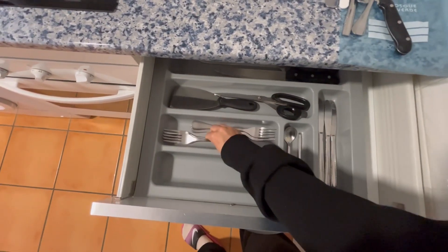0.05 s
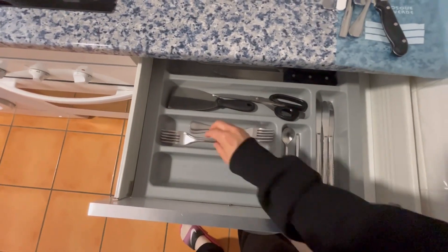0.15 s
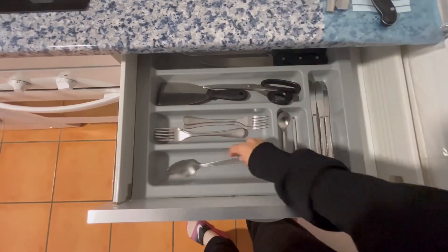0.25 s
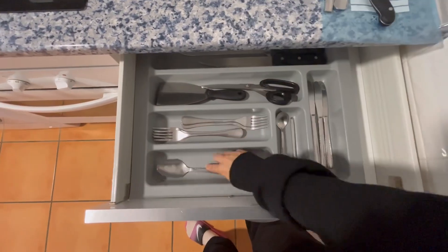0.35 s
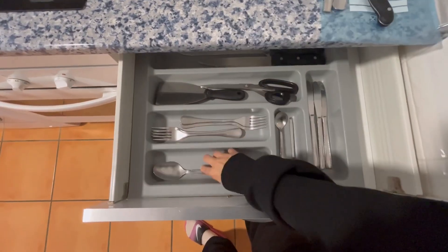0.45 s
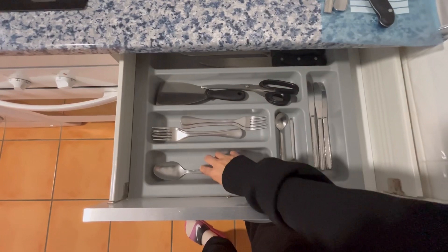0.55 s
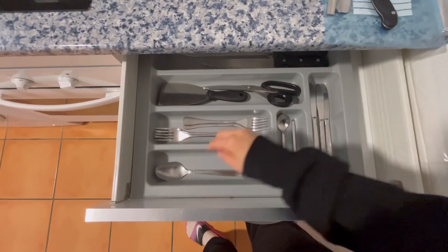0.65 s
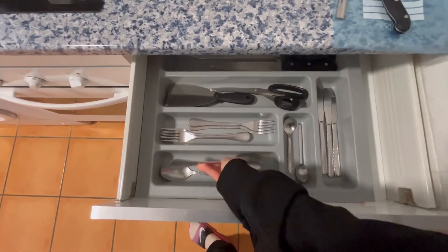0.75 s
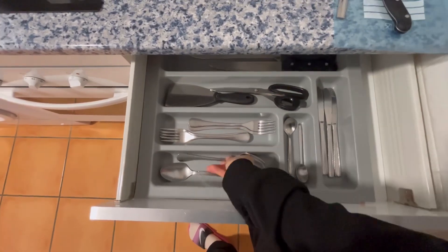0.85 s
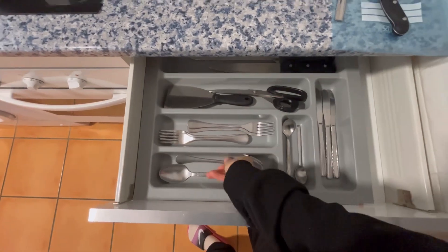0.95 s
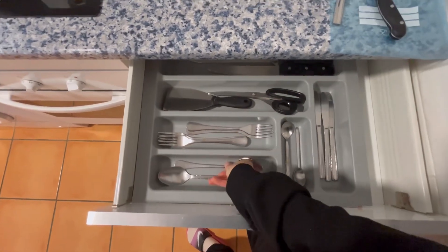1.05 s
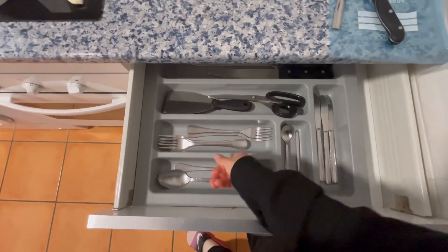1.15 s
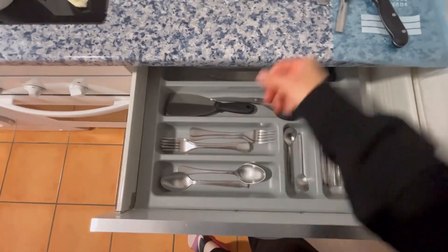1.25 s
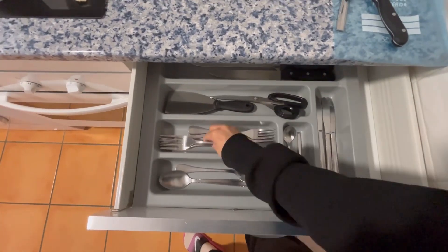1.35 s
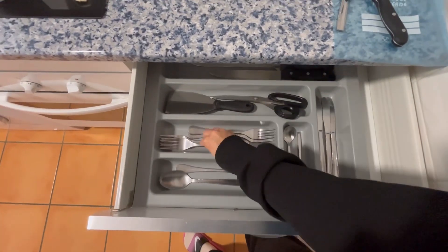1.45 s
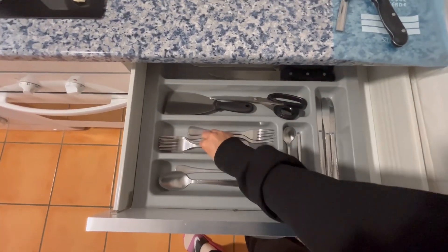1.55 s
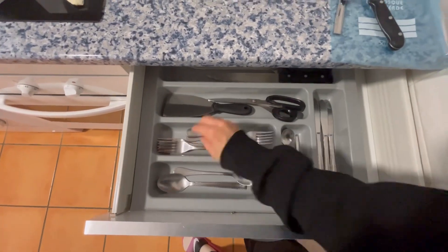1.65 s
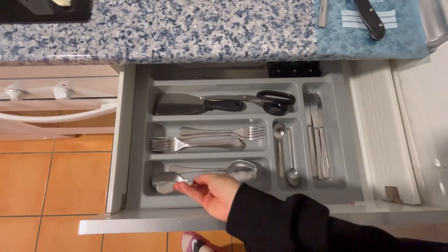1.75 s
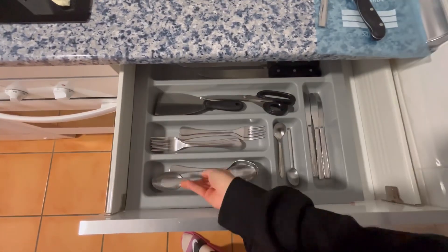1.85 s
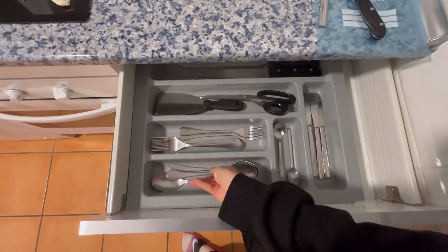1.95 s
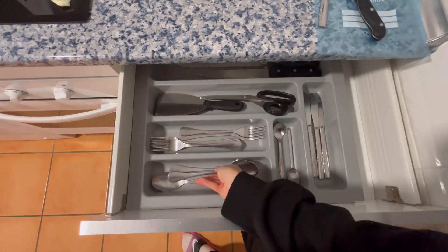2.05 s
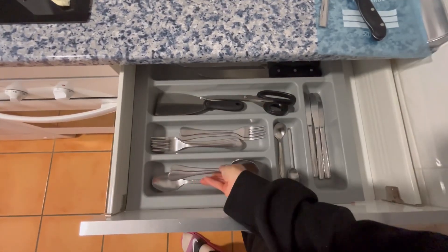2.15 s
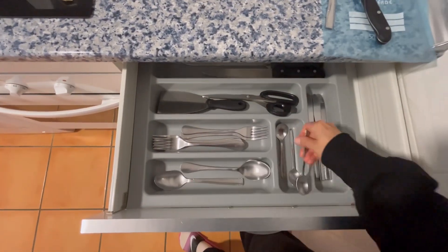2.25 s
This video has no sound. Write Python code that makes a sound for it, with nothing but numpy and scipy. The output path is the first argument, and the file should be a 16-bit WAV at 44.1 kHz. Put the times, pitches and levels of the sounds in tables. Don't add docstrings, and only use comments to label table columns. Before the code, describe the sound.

Metal forks and spoons clink and knock into a plastic cutlery tray in quick abrupt bursts

```python
import sys
import numpy as np
from scipy import signal
from scipy.fft import rfft, irfft
from scipy.io import wavfile
from scipy.ndimage import uniform_filter1d

SR = 44100
rng = np.random.default_rng(int(sys.argv[2]) if len(sys.argv) > 2 else 0)


def nominal_scale(level):
    x = np.asarray(level, float) / 20
    return 10 ** x


def to_wav(sig):
    pcm = np.clip(np.atleast_2d(sig), -1, 1) * 32767
    pcm = np.round(pcm).astype(np.int16)
    wavfile.write(sys.argv[1], SR, pcm.T)


N = 101430
RUN_IN, SIZE = 8192, 65536
HZ = np.maximum(np.arange(SIZE // 2 + 1) * SR / SIZE, 1)
LEFT_RIGHT = np.array([[.5], [-.5]])

SHOT_EDGES_S = [0, .197, .699, 1.303, 1.702, 2.238, 2.31]
FADE_IN_S = [.001, 0.015, 0.0021, 0.095, 0.083, 0.049]
SHOT_TONE_DB = [8, 3.5, -3, 1, 6, -10.5]
SHOT_PAN_DB = [0.1, -0.6, 0.3, -0.88, 0.21, 0.039]

# (frequency [Hz], density [dB per Hz])
TONE = [(25, -45.5), (45, -13.5), (66, 0), (100, -17), (250, -8.5), (600, -28), (3000, -23.5), (15000, -58)]
TONE_DB = -57
# (frequency [Hz], T60 [s])
ROOM = [(100, 1), (260, 0.41), (700, 0.37), (1840, 0.42), (4850, 0.42), (12800, 0.3)]
ROOM_DB, ROOM_GAP_S, DRAWER_DB, DRAWER_T60_S = -9, 0.0067, 3, 0.016
# (frequency [Hz], left lead [rad])
LEAD = [(100, 0.11), (350, -.1), (550, -1.1), (1100, -1.8), (2000, -1.5), (5000, -1.4), (9000, -1.5),
        (13000, -2.3)]
# (frequency [Hz], left minus right [dB])
TILT = [(60, 4), (250, -3), (500, 0.1), (1000, 0.5), (2000, 5.5), (4000, 3), (8000, 8), (13000, -2.5)]
# (frequency [Hz], likeness [0-1])
ALIKE = [(60, 1), (350, 0.81), (600, 0.67), (2000, 0.18), (12000, 0.46)]

# (time [s], frequency [Hz], level [dB], T60 [s])
BUMPS = [
    (.268, 105, -18.5, 0.15),
    (.212, 520, -24, 0.2),
    (.259, 490, -17.5, .14),
    (1.152, 505, -33, 0.14),
    (1.598, 512, -31, .13),
    (1.018, 500, -20, 0.064),
]
# (time [s], frequency [Hz], level [dB], T60 [s])
PINGS = [(.3565, 1400, -11, .04), (.3925, 6300, -20, .018), (.806, 1900, -20, .03), (.8445, 2050, -12, .03),
         (.8575, 5900, -17, .04), (.874, 14200, -21, .1), (1.016, 1500, -23, .08), (1.017, 900, -23, .08),
         (1.03, 8400, -33, .15), (1.192, 6200, -55, .2), (1.605, 1680, -45, .16), (1.833, 15230, -17, .1),
         (1.912, 15200, -16, .12), (1.927, 2090, -12, .06), (1.942, 2070, -12, .12),
         (1.966, 13808, -12, .14)]

# (time [s], tray knock [dB], steel clink [dB], rise [s],
# chatter [s])
CONTACTS = [(-.12, -20, -22, 0.0042, 0.039), (0.039, -46.5, -45, 0.003, 0.068),
            (0.138, -79, -53, 0.0023, 0.01), (0.196, -14, -28, 0.015, 0.041),
            (0.257, -18.5, -32, 0.0059, 0.0061), (0.3, -22, -33.5, 0.0031, 0.011),
            (0.3562, -18, -27.5, 0.0018, 0.072), (0.6998, -52.5, -50, 0.0011, 0.011),
            (.728, -31.5, -59, 0.0049, 0.049), (0.756, -31, -57, 0.0056, 0.0058),
            (0.8039, -19, -26, 0.00092, 0.037), (0.8355, -7, -33.5, .001, 0.0049),
            (.857, -12, -18.5, 0.002, 0.022), (.985, -23, -52.5, 0.023, 0.016),
            (1.026, -32, -24, 0.00098, 0.0036), (1.147, -46, -63, 0.0021, 0.012),
            (1.334, -15.5, -25, 0.0084, 0.078), (1.386, -12, -17.5, 0.0052, 0.039),
            (1.443, -29, -24.5, 0.002, 0.008), (1.595, -37.5, -38, 0.002, 0.0067),
            (1.746, -68, -58, 0.021, 0.0077), (1.83, -21.5, -17.5, 0.0015, 0.066),
            (1.903, -18, -10.5, 0.0028, 0.027), (1.941, -11.5, -8, 0.0028, 0.045),
            (2.25, -51.5, -66.5, .045, .04),
    (1.31, -68, -67.5, 0.0081, 0.014),
    (.3562, -10, -31, 0.0017, 0.0081),
    (1.364, -14.5, -20, 0.0063, 0.012),
]
# (time [s], steel clink [dB], tray knock [dB])
TAPS = [(0.2021, -28.5, -32.5), (0.2104, -21, -32), (0.3025, -22.5, -22.5), (0.3563, -7.5, -1),
        (0.3833, -18.5, -12.5), (0.3881, -18, -15.5), (0.393, -13.5, -14.5), (0.3963, -14.5, -6.5),
        (0.4048, -16, -14), (0.6993, -45, -44.5), (0.7437, -32.5, -31), (0.8051, -18.5, -21),
        (0.836, -6.5, -13), (0.8448, -13, -11.5), (0.857, -5.5, -5.5), (0.8705, -10, -13.5),
        (0.8746, -6, -5), (1.0278, -12, -30), (1.1929, -43, -55), (1.341, -14, -18), (1.3668, -10.5, -13),
        (1.3894, -4.5, -8), (1.3939, -10, -10), (1.4121, -11.5, -12), (1.4172, -10.5, -15.5),
        (1.444, -15.5, -15.5), (1.4496, -17, -13.5), (1.5972, -24.5, -35.5), (1.7584, -42, -62.5),
        (1.8331, -1.5, -34), (1.8417, -4, -25.5), (1.8484, 0, -13), (1.8694, -7.5, -11.5),
        (1.9062, -12, -18.5), (1.9178, -2.5, -18), (1.9274, -2.5, -17), (1.9434, -4.5, -21),
        (1.9547, -7.5, -17.5), (1.9674, -6, -13), (1.9868, -9.5, -16)]
TAP_KNOCK_DB, TAP_CLINK_DB, TAP_DIE_S, TAP_ECHO = -3, -12.5, 0.0032, 0.67
KNOCK_DB, CLINK_DB = -4.0, -2.0
TRAY_TICKS_PER_S, STEEL_TICKS_PER_S, TRAY_SPREAD_DB, STEEL_SPREAD_DB = 2500, 3500, 2.5, 1.5
STRIKE_DB, SHARP_S = 25.5, 0.0014
DIE_S, SAG_DB_PER_S = 0.02, 66.5
TRAY_SPOT_DB, STEEL_SPOT_DB = 3.5, 3

# (frequency [Hz], width [Hz], level [dB])
TRAY = [(105, 14, -20), (255, 20, -8), (382, 16, 5), (441, 30, 0), (514, 43, 3), (637, 25, 0), (765, 35, 2),
        (837, 25, 1), (931, 25, 0), (1116, 27, 0), (1516, 54, -5), (1704, 40, -8), (2084, 40, -7)]
# (frequency [Hz], density [dB per Hz])
TRAY_BODY = [(40, -47), (100, -12), (310, -15.5), (400, -9.5), (1000, -2.5), (2200, -12), (4500, -25.5),
             (10000, -37.5)]
TRAY_RING_DB = -2
# (frequency [Hz], width [Hz], level [dB])
STEEL = [
    [(1920, 23, -1), (2670, 64, 0), (5190, 250, -10), (6440, 42, -10), (10300, 64, -11), (11600, 84, -18)],
    [(3110, 73, 0), (4260, 97, -4), (6170, 75, -7), (10100, 79, -12), (11700, 180, -12), (13300, 130, -11),
     (14300, 47, -4)],
    [(3740, 120, -7), (4390, 35, -2), (5790, 100, -5), (6320, 54, -3), (8500, 42, -3), (9390, 140, -12),
     (11600, 95, -2), (13200, 61, -7), (14200, 110, 0)],
    [(3140, 34, 0), (4180, 40, -2), (5800, 43, -2), (6370, 44, -1), (7800, 37, -1), (11300, 28, -4),
     (11500, 59, -2), (13600, 28, 0), (13900, 80, -4)],
]
# (frequency [Hz], width [Hz], level [dB])
SPOON = [(4900, 90, -7), (5630, 80, -8.5), (6370, 50, -4), (7870, 50, -1), (8200, 28, -7.5),
         (8800, 55, -3.5), (8981, 100, -11.5), (10100, 40, -2), (10500, 55, -1), (11986, 45, -0.5),
         (13350, 60, -7), (13808, 34, -0.5), (13700, 60, -2.5), (16300, 80, 4)]
STEEL_RING_DB = [0, -15, -11.5, -8, -0.5]
# (frequency [Hz], density [dB per Hz])
STEEL_BODY = [(1500, -17), (3500, -2.5), (6000, -2), (9800, -3.5), (11500, -1.5), (12600, -1), (14000, 3),
              (15500, -2.5)]
# (frequency [Hz], density [dB per Hz])
SPOON_BODY = [(1300, -22.5), (2100, -2.5), (4000, -7.5), (5000, -6), (10500, -3.5), (12500, -2), (13800, 0),
              (16000, -14)]
# (frequency [Hz], width [Hz])
SPOON_GAPS = [(4400, 500), (11450, 700), (14500, 900)]
GAP_DB = -22


def at_hz(points, hz=HZ):
    return np.interp(np.log(hz), np.log(np.array(points)[:, 0]), np.array(points)[:, 1])


def unit(h):
    return h / np.sqrt(np.mean(np.abs(h) ** 2))


def causal(points):
    cepstrum = irfft(np.log(nominal_scale(at_hz(points))))
    return unit(np.exp(2 * rfft(cepstrum[:SIZE // 2], SIZE) - cepstrum[0]))


def pair(n):
    mid, side = rfft(rng.standard_normal((2, n)), SIZE)
    alike = np.clip(at_hz(ALIKE), 0, 1)
    return np.sqrt(1 + alike) * mid + np.sqrt(1 - alike) * side * [[1], [-1]]


def room_tone(n, shot):
    noise = irfft(pair(n) * causal(TONE))[:, :n]
    return unit(noise) * nominal_scale(TONE_DB + SHOT_TONE_DB[shot])


def microphones():
    return nominal_scale(LEFT_RIGHT * at_hz(TILT)) * np.exp(1j * LEFT_RIGHT * at_hz(LEAD))


def room_tail():
    t = np.arange(SR // 2) / SR
    noise, out = pair(len(t)), 0
    for hz in 62.5 * 2 ** np.arange(9):
        share = np.clip(1 - np.abs(np.log2(HZ / hz)), 0, 1)
        band = irfft(noise * share)[:, :len(t)]
        out = out + band * nominal_scale(-60 * t / at_hz(ROOM, hz))
    build_up = 1 - np.exp(-t / ROOM_GAP_S)
    return nominal_scale(ROOM_DB) * unit(rfft(out * build_up, SIZE))


def drawer_echoes():
    t = np.arange(SR // 10) / SR
    echoes = irfft(pair(len(t)))[:, :len(t)] * nominal_scale(-60 * t / DRAWER_T60_S)
    h = 1 + nominal_scale(DRAWER_DB) * unit(rfft(echoes, SIZE))
    return h / np.sqrt(uniform_filter1d(np.abs(h) ** 2, size=800))


def thuds_and_pings(t):
    out = 0
    for start_s, hz, db, t60_s in BUMPS + PINGS:
        u = t - start_s
        decay = nominal_scale(db - 60 * np.maximum(u, 0) / t60_s)
        out = out + decay * np.clip(u * hz, 0, 1) * np.sin(2 * np.pi * hz * u)
    lead = np.interp(np.arange(SIZE + 1) / 2, np.arange(len(HZ)), at_hz(LEAD))
    return irfft(rfft(out, 2 * SIZE) * np.exp(1j * lead * LEFT_RIGHT))[:, :len(t)]


def modes(rows):
    bank = []
    for k, (hz, width_hz, db) in enumerate(rows):
        damping = 1j * HZ * width_hz
        bank.append((-1) ** k * nominal_scale(db) * damping / (hz ** 2 - HZ ** 2 + damping))
    bank = np.array(bank)
    return bank / np.sqrt(np.mean(np.abs(bank.sum(axis=0)) ** 2))


def spoon_gaps():
    out = 1
    for hz, width_hz in SPOON_GAPS:
        damping = 1j * HZ * width_hz
        out = out * (hz ** 2 - HZ ** 2 + damping * nominal_scale(GAP_DB)) / (hz ** 2 - HZ ** 2 + damping)
    return out


def steel_piece(shot):
    ring = nominal_scale(STEEL_RING_DB[min(shot, 4)]) * modes(STEEL[shot] if shot < 4 else SPOON)
    return ring, causal(SPOON_BODY if shot == 4 else STEEL_BODY)


def touches(per_s, spread_db):
    n = N + RUN_IN
    sizes = nominal_scale(spread_db * np.minimum(rng.exponential(1, n), 4)) * rng.choice([-1, 1], n)
    return unit(sizes * (rng.random(n) < per_s / SR))


def contact(row, chatter, t, die_s):
    u, rise_s, hold_s = t - row[0], max(row[3], 1e-4), row[4]
    rise = np.clip(u / rise_s, 0, 1) ** 2
    die = np.exp(-np.maximum(u - rise_s - hold_s, 0) / die_s)
    sag = nominal_scale(-SAG_DB_PER_S * np.clip(u - rise_s, 0, hold_s))
    push = chatter * rise * die * sag
    blow_at = min(np.searchsorted(u, rise_s), len(u) - 1)
    push[blow_at] += nominal_scale(STRIKE_DB) * np.exp(-rise_s / SHARP_S)
    return rfft(push, SIZE)


def all_contacts():
    hits = [(row, DIE_S, 1) for row in CONTACTS]
    for s, clink_db, knock_db in TAPS:
        row = (s, knock_db + TAP_KNOCK_DB, clink_db + TAP_CLINK_DB, 3e-4, 1e-3)
        hits.append((row, TAP_DIE_S, TAP_ECHO))
    return hits


def scene():
    t = (np.arange(N + RUN_IN) - RUN_IN) / SR
    rooms = [room_tail() for _ in range(3)]
    mics = microphones()
    places = [drawer_echoes() for _ in range(7)]
    knocks = touches(TRAY_TICKS_PER_S, TRAY_SPREAD_DB)
    clinks = touches(STEEL_TICKS_PER_S, STEEL_SPREAD_DB)
    tray_body, tray = causal(TRAY_BODY), nominal_scale(TRAY_RING_DB) * modes(TRAY)
    events = all_contacts()
    spots = nominal_scale([[TRAY_SPOT_DB], [STEEL_SPOT_DB]] * rng.standard_normal((len(events), 2, 14)))
    out = thuds_and_pings(t)
    for k, (start, end) in enumerate(zip(SHOT_EDGES_S, SHOT_EDGES_S[1:])):
        at = slice(max(int(start * SR), 0), int(end * SR) + RUN_IN)
        u, hits = t[at], 0
        steel, steel_body = steel_piece(k)
        for (row, die_s, echo), spot in zip(events, spots):
            if row[0] >= end or (k > 0 and row[0] < start - .004):
                continue
            tray_sound = tray_body + spot[0, :len(tray)] @ tray
            steel_sound = steel_body + spot[1, :len(steel)] @ steel
            knock = nominal_scale(row[1] + KNOCK_DB) * contact(row, knocks[at], u, die_s) * tray_sound
            clink = nominal_scale(row[2] + CLINK_DB) * contact(row, clinks[at], u, die_s) * steel_sound
            ms = int(row[0] * 1000)
            space = places[ms % 7] + rooms[ms % 3]
            hits = hits + (knock + clink) * (1 - echo + echo * space)
        tone = room_tone(len(u), k) * np.clip((u - start) / FADE_IN_S[k], 0, 1)
        hits = hits * mics * nominal_scale(SHOT_PAN_DB[k] * LEFT_RIGHT) * (spoon_gaps() if k == 4 else 1)
        heard = irfft(hits)[:, :len(u)] + tone
        out[:, at] += heard * (u >= start) * np.clip((end - u) / .002, 0, 1)
    return out[:, RUN_IN:]


def top_cut(x):
    return signal.sosfilt(signal.butter(12, 16000, fs=SR, output="sos"), x)


def record(dry):
    low_pass = signal.cheby2(12, 50, 16300, fs=SR, output="sos")
    mix = np.clip(signal.sosfilt(low_pass, dry), -1, 1)
    return top_cut(mix)


dry = scene()
out = record(dry)
to_wav(out)
```